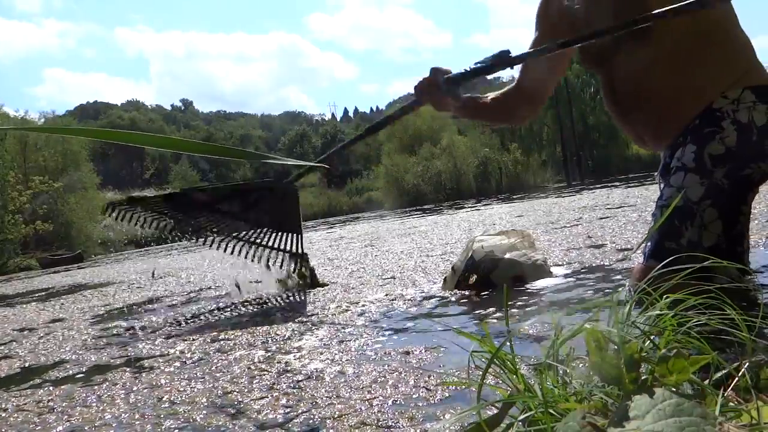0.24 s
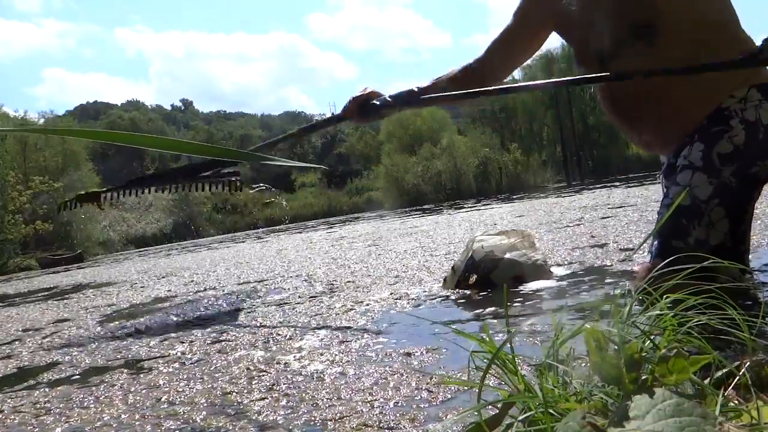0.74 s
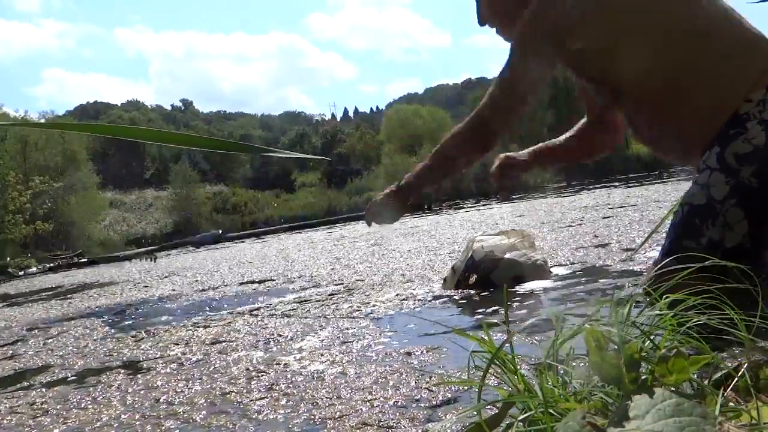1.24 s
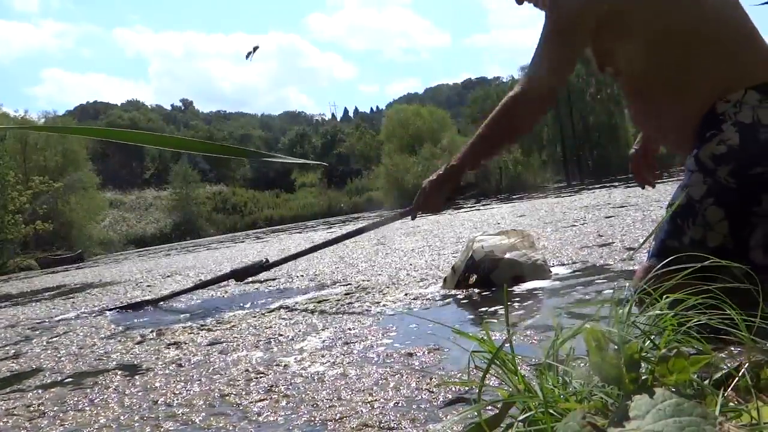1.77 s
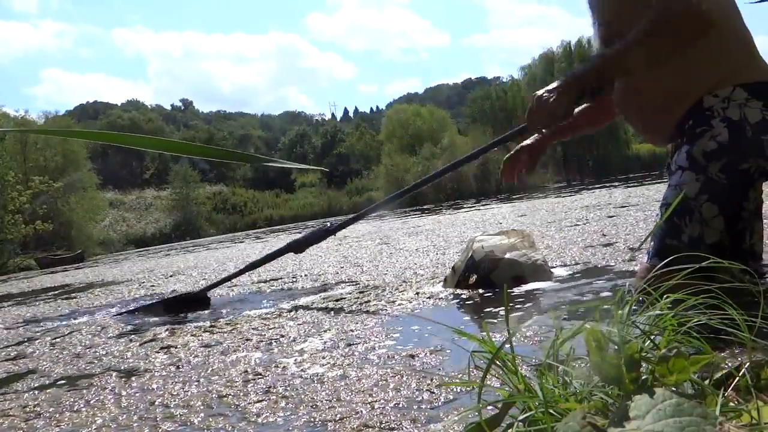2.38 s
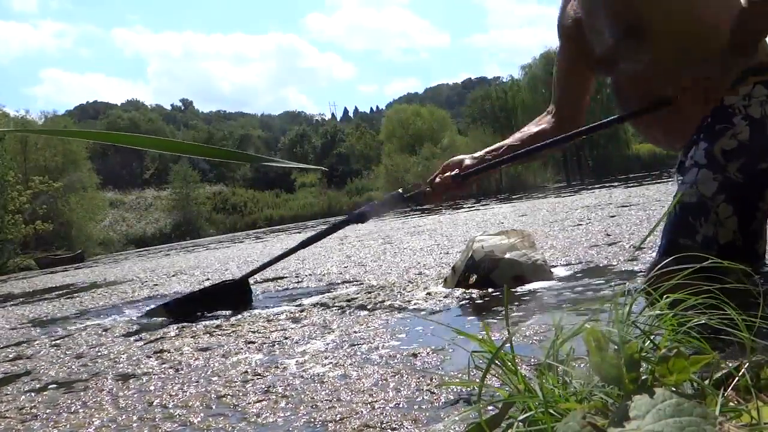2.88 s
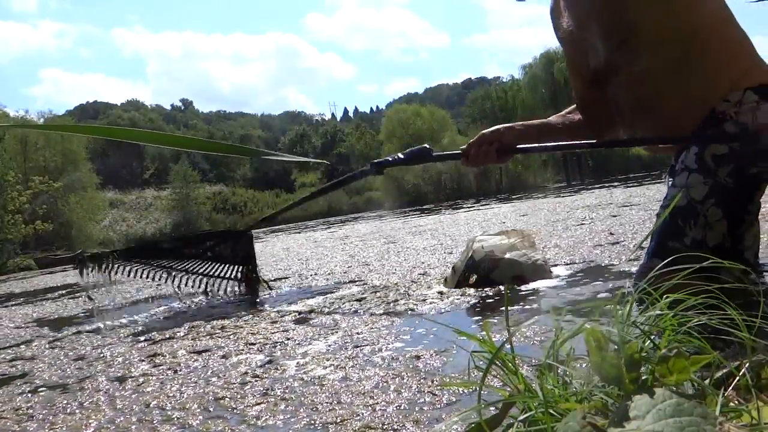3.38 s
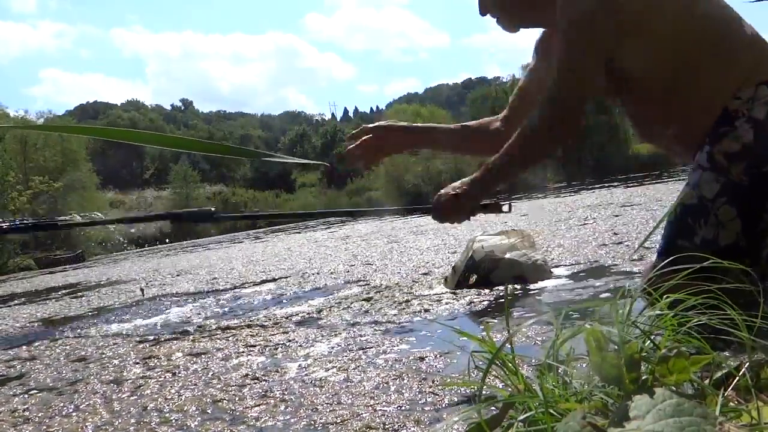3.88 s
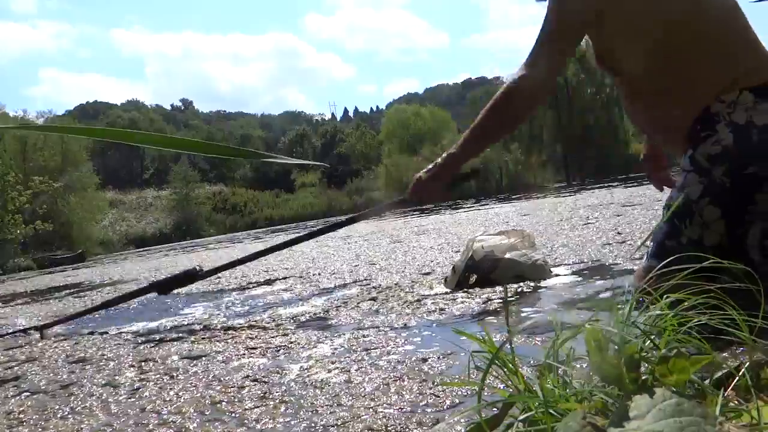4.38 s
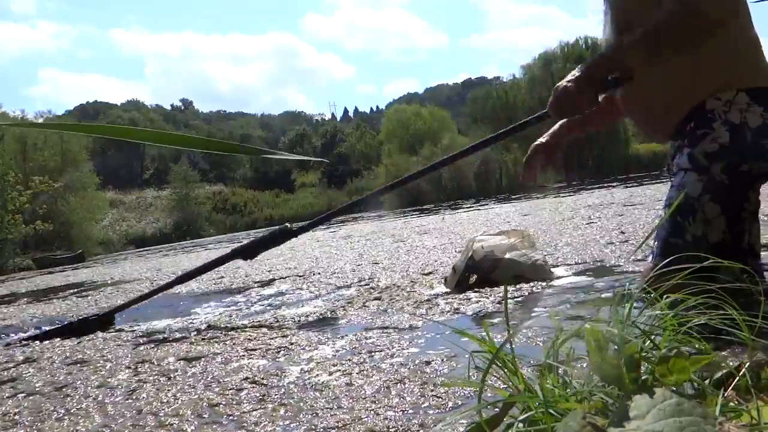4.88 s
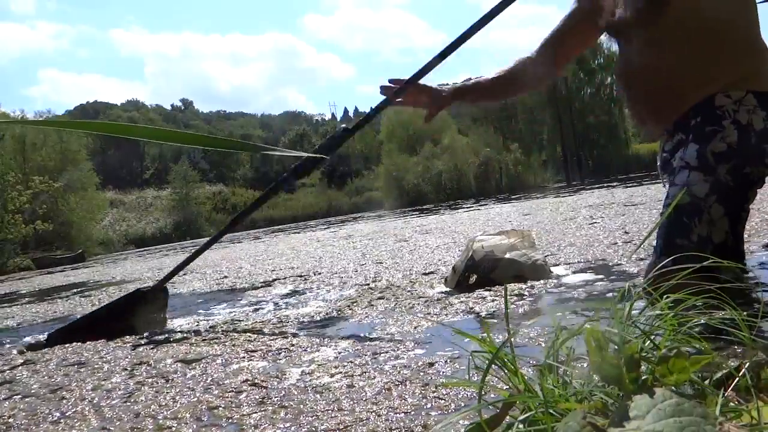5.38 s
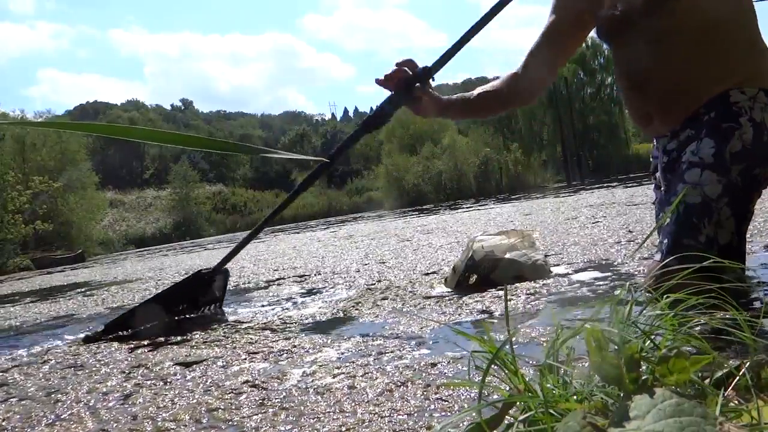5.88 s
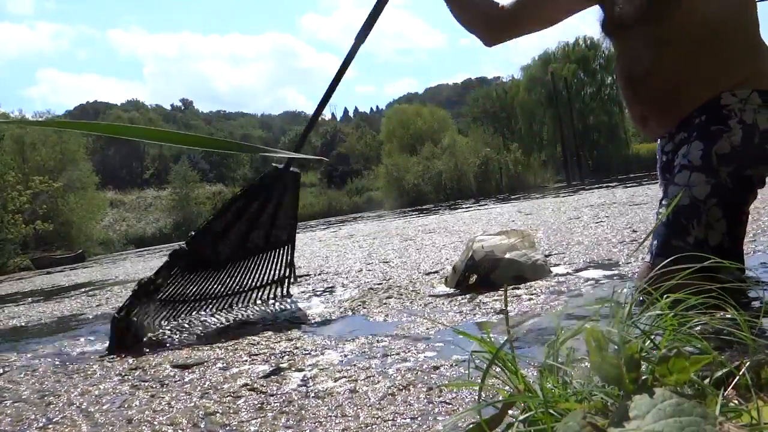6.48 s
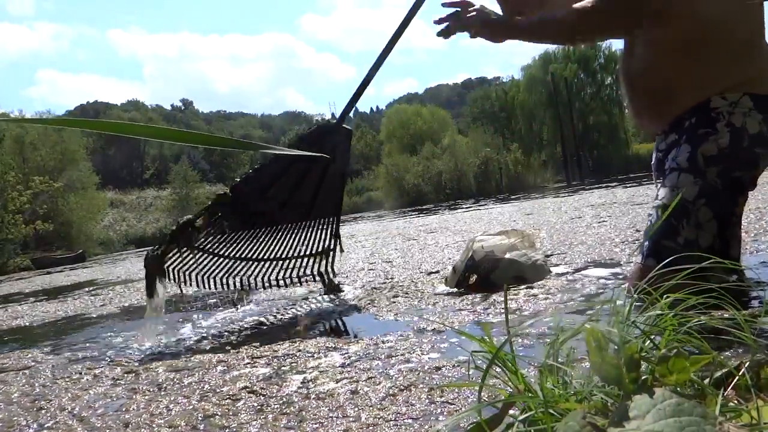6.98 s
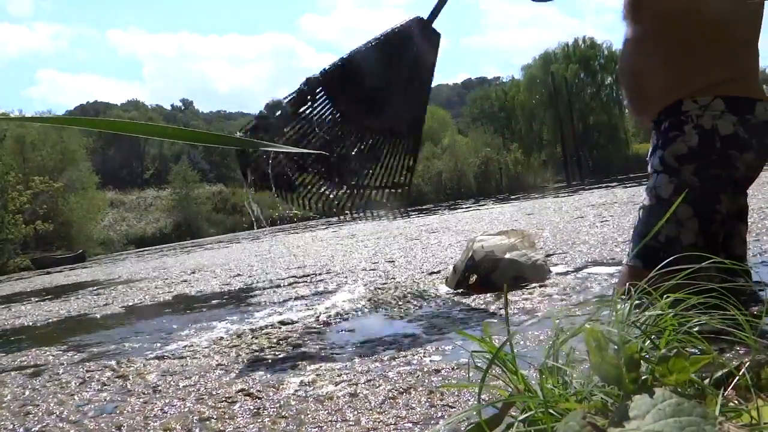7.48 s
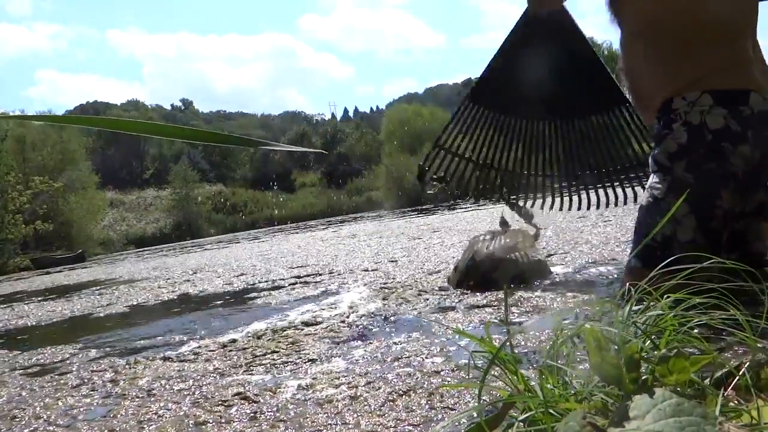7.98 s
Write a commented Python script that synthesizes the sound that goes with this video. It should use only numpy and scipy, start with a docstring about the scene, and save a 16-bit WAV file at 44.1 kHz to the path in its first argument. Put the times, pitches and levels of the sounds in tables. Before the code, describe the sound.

A high hiss of distant cicadas fills the air by a pond. Closer, one cicada throbs about three times a second, then settles into a rattle, while another holds a thin whine that sags into a dry rasp. Beneath them a leaf rake slaps the water twice and drags through algae with soft sloshes, gulps and trickles. Near the end, drops patter and wet weed plops off the tines. The microphone is at the water's edge.

```python
"""Cicadas sing all round a weedy pond on a hot day, the distant ones merged into a hiss.
Nearer the microphone, one buckles its ribbed tymbals in three throbs a second, then settles into a
rattle; another clicks so fast that it holds a thin high whine, which sags and breaks into a dry rasp.
A leaf rake slaps the water twice and drags algae out. Trapped air rings as gulps and trickles,
and wet weed drops off the tines."""
import sys
import numpy as np
from scipy import signal
from scipy.fft import rfft, irfft, next_fast_len
from scipy.io import wavfile

SR = 44100
rng = np.random.default_rng(int(sys.argv[2]) if len(sys.argv) > 2 else 0)


def int16_out(signal):
    """Quantize to a 16-bit WAV file."""
    q = np.round(np.clip(np.atleast_2d(signal).T, -1, 1) * 32767)
    wavfile.write(sys.argv[1], SR, q.astype(np.int16))


N = 363384
TIME = np.arange(N) / SR


def from_db(db):
    """Decibels to gain."""
    return 10 ** (np.asarray(db) / 20)


def rms_one(x):
    """Scale to unit power."""
    return x / np.sqrt(np.mean(np.abs(x) ** 2) + 1e-20)


def in_time(rows):
    """Each column of a curve, sample by sample."""
    s, *columns = np.transpose(rows)
    return [np.interp(TIME, s, c) for c in columns]


def swell(crest_s, half_width_s):
    """A smooth rise and fall, height 1."""
    return np.exp(-.5 * np.minimum(((TIME - crest_s) / half_width_s) ** 2, 100))


def add(out, s, sound):
    """Mix a short sound in at time s."""
    start = int(np.clip(round(s * SR), 0, N - 1))
    out[start:start + len(sound)] += sound[:N - start]


def coloured(spectrum):
    """Noise with the given spectral shape, rms 1."""
    hz, db = np.transpose(spectrum)
    size = next_fast_len(N)
    bins = np.maximum(np.fft.rfftfreq(size, 1 / SR), 1)
    gain = from_db(np.interp(np.log(bins), np.log(hz), db, left=-90))
    return rms_one(irfft(rfft(rng.standard_normal(size)) * gain, size)[:N])


def drift(rate):
    """Smooth random wander up to about rate changes a second, spread 1."""
    size = next_fast_len(N)
    gain = np.exp(-.5 * (np.fft.rfftfreq(size, 1 / SR) / rate) ** 2)
    return rms_one(irfft(rfft(rng.standard_normal(size)) * gain, size)[:N])


def place(direct, scattered, pan_db, side_db):
    """A source leans to one side of the microphone; scattered sound differs between left and right."""
    side = from_db(side_db) * scattered
    return np.array([(direct + side) * from_db(pan_db / 2), (direct - side) * from_db(-pan_db / 2)])


def wide_noise(spectrum, pan_db, side_db):
    """Coloured noise in stereo."""
    return place(coloured(spectrum), coloured(spectrum), pan_db, side_db)


def bank_echo(x):
    """Scattered returns from the bank and reeds."""
    t = np.arange(SR // 4) / SR
    tail = rng.standard_normal(len(t)) * np.exp(-t / 0.015) * (t > .003)
    return signal.fftconvolve(x, tail / np.linalg.norm(tail))[:N]


def far_chorus():
    """Many distant cicadas merge into a smooth hiss."""
    # colour of the hiss: (frequency [Hz], relative density [dB])
    spectrum = [(2700, -36), (3200, -20), (3700, -6.5), (4400, -1.5), (5100, 0), (5700, 2), (6500, -2),
                (7200, -5), (7900, -2.5), (9000, -14.5), (11000, -15.5)]
    # its loudness: (time [s], level [dB])
    loudness = [(0, -26), (1.7, -25.5), (3.2, -26.5), (4.5, -27.5), (5.4, -27), (6.3, -26.5), (7.0, -28.5),
                (8.24, -27.5)]
    level_db, = in_time(loudness)
    return from_db(level_db) * wide_noise(spectrum, pan_db=2.5, side_db=-11)


def narrow_ring(hz, width_hz):
    """A resonance kept ringing by uneven clicks, rms 1."""
    turn = np.exp(2j * np.pi * np.cumsum(hz) / SR)
    return rms_one(np.real(turn * (drift(width_hz) + 1j * drift(width_hz))))


def abdomen_ring(depth, semitones):
    """The cicada's abdomen rings low while it throbs; in the rattle it holds a higher, wavering tone."""
    shift = 2 ** (semitones / 12)
    low = narrow_ring(5117 * shift, width_hz=44)
    high_hz = 5570 * shift + 62 * drift(30.5)
    high = np.sqrt(2) * np.sin(2 * np.pi * np.cumsum(high_hz) / SR)
    return depth * from_db(-10) * low + (1 - depth) * from_db(-7.5) * high


def throbbing_cicada():
    """Two tymbals buckle in turn, rib after rib, each a short falling zip; in a throb one dominates."""
    # drive between the throbs: (time [s], level [dB])
    steady_drive = [(0, -28.5), (1.3, -30.5), (1.6, -23.5), (2.5, -24.5), (2.75, -29.5), (3.7, -24.5),
                    (5.05, -25), (5.4, -28), (7.5, -27), (8.24, -28)]
    # surges of the closing rattle: (crest [s], half-width [s], level [dB])
    surges = [(5.78, 0.24, -24), (6.45, 0.21, -24), (7.42, 0.21, -22.5)]
    # manner of song: (time [s], tymbal cycles [1/s], throb depth [0-1], pitch shift [semitones])
    manner = [(0, 81, 1, -.2), (3.9, 81, 1, 0), (5.2, 81, 1, .9), (5.9, 79, .7, .7), (6.5, 79.5, 0, .4),
              (7.4, 78.7, 0, .1), (8.24, 77, 0, -.3)]
    # crests of the throbs: (time [s], relative level [dB])
    throbs = [(-.18, -27), (0.139, -26), (0.459, -31), (0.761, -27), (1.08, -27.5), (1.44, -37),
              (1.689, -35), (1.979, -31), (2.301, -25), (2.601, -26.5), (2.92, -34), (3.271, -24),
              (3.569, -23), (3.88, -28.5), (4.21, -52), (4.549, -25.5), (4.879, -22.5), (5.199, -21.5),
              (5.54, -37), (5.84, -31), (6.12, -38), (6.401, -28.5)]
    # ribs in buckling order: (unshifted pitch [Hz], relative level [dB])
    ribs = [(6520, -7.5), (5685, -3), (5550, -2), (5070, -4.5)]
    drive_db, = in_time(steady_drive)
    surge_power = sum((from_db(db) * swell(s, width)) ** 2 for s, width, db in surges)
    drive = np.sqrt(from_db(drive_db) ** 2 + surge_power)
    rate, depth, semitones = in_time(manner)
    crests, crest_db = np.transpose(throbs)
    throb = np.interp(TIME, crests, np.arange(len(crests)))
    nearest = np.round(throb).astype(int)
    effort = from_db(crest_db[nearest]) * swell(crests[nearest], half_width_s=0.065)
    # the beat slows through each crest and picks up again between crests
    cycle = np.cumsum(rate - 4.5 * depth * np.sin(2 * np.pi * throb)) / SR
    beats = np.flatnonzero(np.diff(np.floor(2 * cycle)))
    t = np.arange(SR // 150) / SR
    envelope = (1 - np.exp(-t / 0.0011)) * np.exp(-t / 0.00038)
    envelope *= np.sqrt(SR / rate.mean() / len(ribs)) / np.linalg.norm(envelope)
    song = np.zeros(N)
    for n, i in enumerate(beats):
        chance = rng.standard_normal(2 * len(ribs) + 1)
        weak_side = n % 2
        base = drive[i] * from_db(-2.5 - 3 * depth[i] if weak_side else depth[i])
        strength = np.hypot(base, effort[i] * (.15 if weak_side else 1.85))
        rattle = 1 - depth[i]
        # the ribs follow one another faster as each throb goes on
        gap_s = .0016 * (1 - .09 * depth[i] * (throb[i] - nearest[i])) * (1 - .3 * rattle)
        start = i / SR + .00007 * chance[-1]
        tension = 2 ** ((semitones[i] + 0.34 * rattle) / 12)   # the ribs sound higher in the rattle
        for k, (hz, db) in enumerate(ribs):
            click = envelope * np.sin(2 * np.pi * hz * tension * (1 + .014 * chance[k]) * t)
            add(song, start + k * gap_s, strength * from_db(db + 0.5 * chance[len(ribs) + k]) * click)
    song += drive * abdomen_ring(depth, semitones) * (1 - .6 * np.cos(4 * np.pi * cycle))
    song += from_db(-18) * bank_echo(song)
    return place(song, bank_echo(song), pan_db=2.5, side_db=-36)


def whining_cicada():
    """Fast, even tymbal clicks give a stack of thin lines; as the song runs down they blur to a rasp."""
    # pace, steady until it runs down: (time [s], clicks [1/s])
    pace = [(0, 211), (1.2, 211.5), (2.5, 212), (3.9, 212.6), (4.25, 212.5), (4.54, 211.5), (4.74, 209.1),
            (5.02, 201.8), (5.4, 193.5)]
    # loudness of the whine: (time [s], level [dB])
    loudness = [(0, -44), (.8, -36.5), (1.7, -27), (2.65, -29), (3.0, -29.5), (4.3, -29.5), (5.1, -34),
                (5.4, -37), (5.9, -70)]
    # its lines: (harmonic [number], relative level [dB])
    partials = [(28, -10), (30, -6), (31, -15), (34, -15), (35, -8.5), (36, -7), (37, -6), (38, -4),
                (39, -9), (40, -11), (41, -2), (42, -12), (43, -5.5), (44, -6), (45, -28), (46, -13),
                (47, -9.5), (48, -30), (49, -16.5), (50, -14.5), (51, -18.5)]
    # single lines swell or sink: (crest [s], harmonic [number], half-width [s], gain [dB])
    line_swells = [(.5, 40, 0.45, 14), (.5, 37, 0.46, -14), (.7, 38, 0.27, 9), (1.45, 34, 0.69, 9.5),
                   (1.75, 41, 0.17, 4), (2.45, 41, 0.14, -11), (2.68, 44, 0.1, -22), (2.8, 39, 0.24, 7),
                   (3.2, 44, 0.33, 11), (3.3, 35, 0.56, 4), (3.3, 37, 0.69, 11.5), (3.3, 51, 0.65, 14.5),
                   (4.45, 38, 0.15, 10.5)]
    # colour of the dry rasp: (frequency [Hz], relative density [dB])
    rasp_spectrum = [(6000, -32), (6900, -40), (7500, 8), (8200, 9), (8650, 5.5), (9100, 8.5), (9600, 6),
                     (10300, 3.5), (11000, -2)]
    # the rasp outlasts the whine: (time [s], relative level [dB])
    rasp_fade = [(0, -34), (.8, -30), (3.4, -34), (4.8, -27.5), (5.9, -32), (6.4, -34.5), (7.5, -40),
                 (8.24, -41)]
    rate, = in_time(pace)
    level_db, = in_time(loudness)
    run_down_s, doubling_s = 4.3, .21   # click timing loosens as the song runs down
    jitter = np.minimum(0.000158 * 2 ** (np.maximum(TIME - run_down_s, 0) / doubling_s), .012)
    phase = 2 * np.pi * np.cumsum(rate * (1 + jitter * drift(45))) / SR
    tone = np.zeros(N)
    for harmonic, db in partials:
        k = round(harmonic)
        swell_db = sum(gain * swell(s, width) for s, line, width, gain in line_swells if round(line) == k)
        fading_db = 4 * np.tanh(drift(3.4))
        amplitude = from_db(level_db + db + swell_db + fading_db)
        tone += amplitude * np.sin(k * phase + rng.uniform(0, 2 * np.pi))
    rasp_db, = in_time(rasp_fade)
    rasp = from_db(rasp_db - 2.5) * wide_noise(rasp_spectrum, pan_db=2.5, side_db=-5.0)
    linger_s, sag_hz_per_s = 5.7, 160   # a ring lingers in the rasp, sinking slowly
    ring_hz = 9090 - sag_hz_per_s * (TIME - linger_s)
    tone += from_db(-39.5) * swell(linger_s, half_width_s=0.37) * narrow_ring(ring_hz, width_hz=140)
    return place(tone, bank_echo(tone), pan_db=1.6, side_db=-16) + rasp


def open_air():
    """A soft wash of outdoor noise over the pond."""
    # colour of the air: (frequency [Hz], relative density [dB])
    spectrum = [(25, -42), (50, -26), (100, -24.5), (170, -11.5), (280, -4.5), (480, 0), (700, 0.5),
                (900, -6), (1200, -3), (1700, -9.5), (3000, -5), (6000, -19), (11000, -18.5)]
    return from_db(-45) * wide_noise(spectrum, pan_db=-0.8, side_db=-13)


def bubble(hz, decay, rise):
    """A trapped air pocket rings, rising in pitch as it nears the surface."""
    t = np.arange(int(7 * decay * SR) + 2) / SR
    envelope = np.exp(-t / decay) * (1 - np.exp(-2 * hz * t))
    return envelope * np.sin(2 * np.pi * hz * t * (1 + rise * t / decay))


def droplets(per_s, low_hz, high_hz, cycles, spread_db):
    """Tiny bubbles of all sizes at random moments, rms 1."""
    out = np.zeros(N)
    for when, size, strength in rng.random((int(per_s * N / SR), 3)):
        hz = low_hz * (high_hz / low_hz) ** size
        gain = from_db(spread_db * min(-np.log(1 - strength), 4))
        add(out, when * N / SR, gain * bubble(hz, cycles / hz, rise=0.03))
    return rms_one(out)


def stirred(crest_s, dying_s, rise_s):
    """Motion builds up to a crest and dies away, height 1."""
    return np.where(TIME < crest_s, swell(crest_s, rise_s), np.exp(-np.abs(TIME - crest_s) / dying_s))


def raked_water():
    """The pond sloshes and trickles where the rake stirs the weed; shaken drops patter on the grass."""
    # rake strokes: (crest [s], dying time [s], relative slosh [dB], relative trickle [dB])
    strokes = [(.8, 0.5, -46.5, -48.5), (1.56, 0.23, -44, -51.5), (2.95, 0.88, -45, -74),
               (4.33, .4, -47.5, -44), (4.65, 0.62, -44.5, -56.5), (6.17, 0.41, -45.5, -46),
               (6.9, 0.75, -47.5, -48), (7.7, 0.19, -43, -42), (8.2, .3, -61, -46)]
    # showers of drops: (crest [s], dying time [s], level [dB])
    showers = [(7.65, 0.12, -37), (8.08, .4, -35)]
    slosh, trickle = from_db(-56), from_db(-50.5)   # calm water
    for s, dying_s, slosh_db, trickle_db in strokes:
        motion = stirred(s, dying_s, rise_s=0.19)
        slosh = np.hypot(slosh, from_db(slosh_db) * motion)
        trickle = np.hypot(trickle, from_db(trickle_db) * motion)
    patter = sum(from_db(db) * stirred(s, dying_s, rise_s=0.054) for s, dying_s, db in showers)
    large = droplets(per_s=340, low_hz=294, high_hz=760, cycles=1.64, spread_db=2.5)
    small = droplets(per_s=800, low_hz=931, high_hz=3390, cycles=5.1, spread_db=3.5)
    fine = droplets(per_s=630, low_hz=6800, high_hz=10700, cycles=6.5, spread_db=4.5)
    water = from_db(-3.5) * slosh * large + from_db(-2) * trickle * small + patter * fine
    return place(water, bank_echo(water), pan_db=0.7, side_db=-9.5)


def splashes():
    """Each slap throws spray and opens a hollow in the water that plops; drips and gulps ring singly."""
    # rake and wet weed hitting the water:
    # (time [s], relative spray [dB], relative plop [dB], plop pitch [Hz], burst decay [s])
    slaps = [(1.384, -23, -25, 554, 0.0078), (1.397, -16.5, -16.5, 417, 0.0044),
             (4.111, -24, -25.5, 500, 0.008), (4.126, -31.5, -45, 686, 0.026),
             (4.157, -28, -44, 543, 0.0088), (4.167, -13, -16, 358, 0.0028), (4.189, -27, -59, 580, 0.0085),
             (7.629, -30, -25.5, 920, 0.013), (7.646, -39, -26, 398, 0.0072),
             (8.073, -25, -28, 620, 0.0038), (8.097, -29, -48, 397, 0.0049), (8.115, -31, -33, 547, 0.0052),
             (8.193, -25, -26, 573, 0.0038)]
    # drips and gulps: (time [s], pitch [Hz], level [dB], decay [s])
    drips = [(.698, 1810, -26.5, .002), (0.789, 450, -38, 0.017), (1.179, 2390, -21.5, 0.0015),
             (1.398, 252, -36, 0.005), (1.655, 1500, -31, .003), (2.323, 2200, -23.5, 0.0011),
             (2.945, 459, -36, 0.018), (2.972, 482, -27, 0.012), (2.976, 199, -29, 0.011),
             (2.978, 115, -37, 0.013), (3.058, 330, -34, 0.0072), (4.53, 623, -33, .014),
             (6.707, 590, -33, 0.0079), (6.814, 150, -36, 0.0073), (6.845, 278, -31, 0.012),
             (6.905, 298, -39, 0.023), (7.042, 397, -34, 0.016)]
    # colour of the spray: (frequency [Hz], relative density [dB])
    spray_spectrum = [(40, -28), (100, -29), (300, -4.5), (600, 7), (900, -3.5), (1800, 4.5), (3200, 2.5),
                      (5000, -1.5), (8000, 4.5), (11000, -4.5)]
    # colour of the hollow under a slap: (frequency [Hz], relative density [dB])
    hollow_spectrum = [(50, -22), (95, -5), (160, -7), (280, 3), (520, 3), (750, 10.5), (1200, -22),
                       (3000, -43)]
    spray, hollow, plops = np.zeros((3, N))
    for s, spray_db, plop_db, hz, decay in slaps:
        t = np.arange(int(8 * decay * SR) + 2) / SR
        burst = np.exp(-t / decay) * (1 - np.exp(-t / 0.0031))
        add(spray, s, from_db(spray_db + 8.0) * burst)
        add(hollow, s, from_db(plop_db - 2) * burst)
        add(plops, s, from_db(plop_db + 1) * bubble(hz, decay=0.0042, rise=0.016))
    for s, hz, db, decay in drips:
        add(plops, s, from_db(db) * bubble(hz, decay, rise=0.017))
    water = spray * coloured(spray_spectrum) + hollow * coloured(hollow_spectrum) + plops
    water += from_db(-12) * bank_echo(water)
    return place(water, bank_echo(water), pan_db=2.0, side_db=-14.5)


def scene():
    """From the water's edge: cicadas in the trees, the rake in the pond."""
    return far_chorus() + throbbing_cicada() + whining_cicada() + open_air() + raked_water() + splashes()


def record(dry):
    """The microphone sheds the deep bass; the top is cut steeply."""
    low_hz, high_hz = 75, 11000
    thin = signal.sosfilt(signal.butter(2, low_hz, "high", fs=SR, output="sos"), dry)
    return signal.sosfilt(signal.ellip(14, .1, 90, high_hz, fs=SR, output="sos"), thin)


dry = scene()
out = record(dry)
int16_out(out)
```